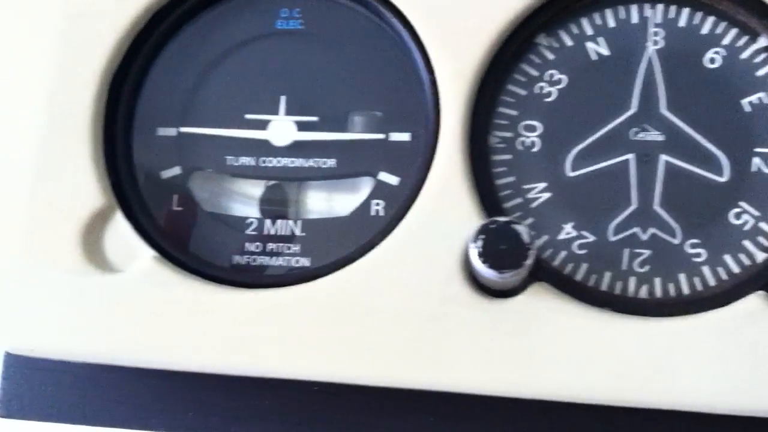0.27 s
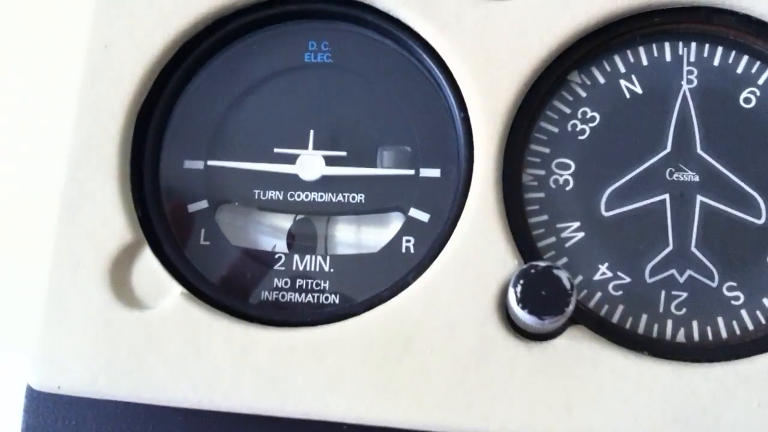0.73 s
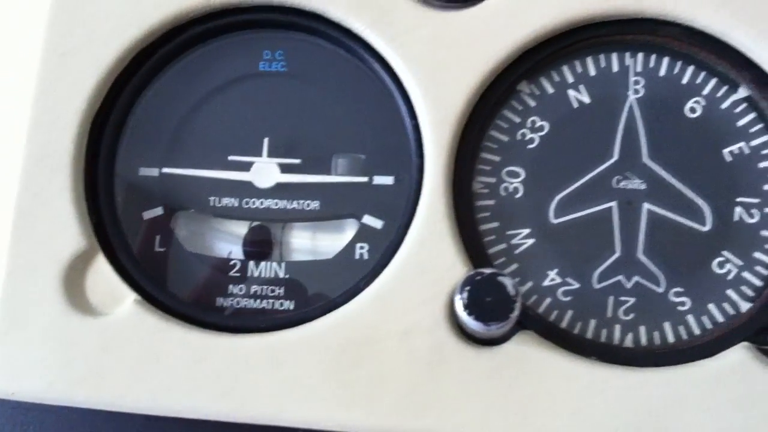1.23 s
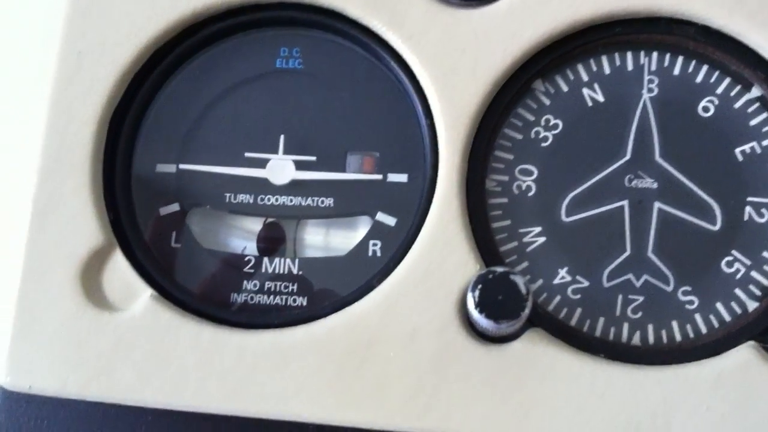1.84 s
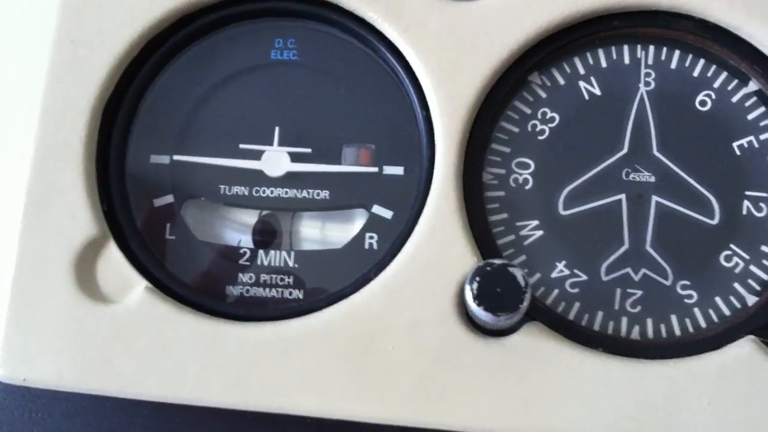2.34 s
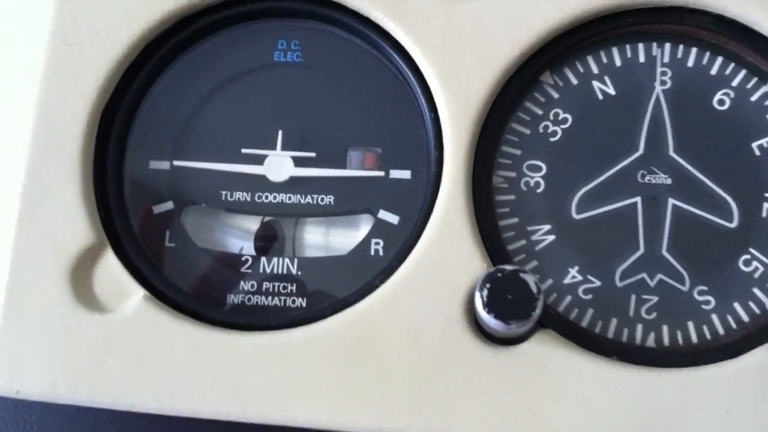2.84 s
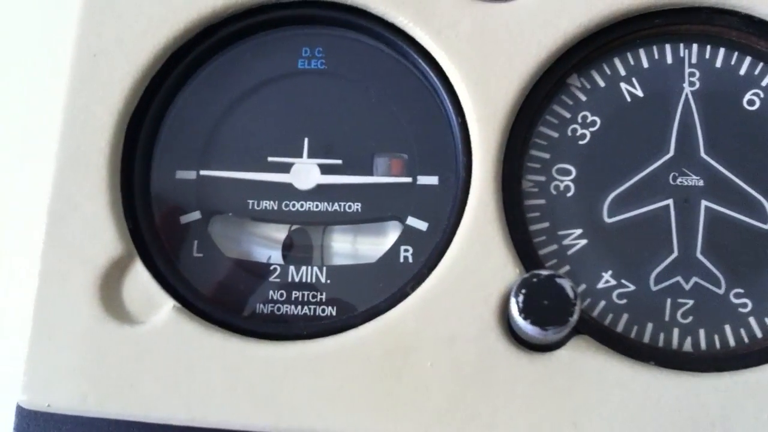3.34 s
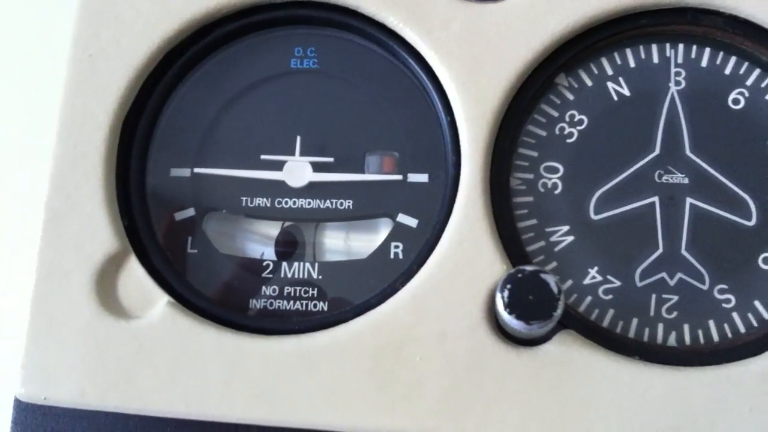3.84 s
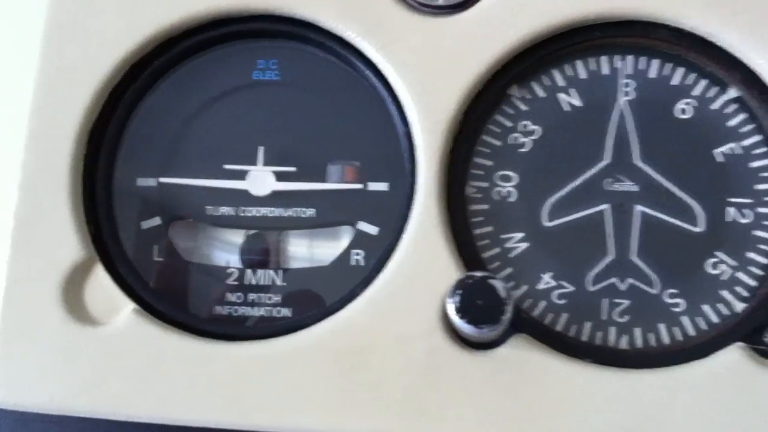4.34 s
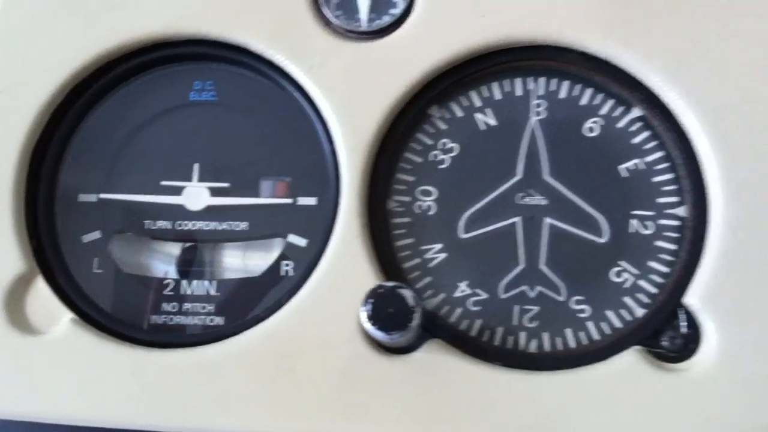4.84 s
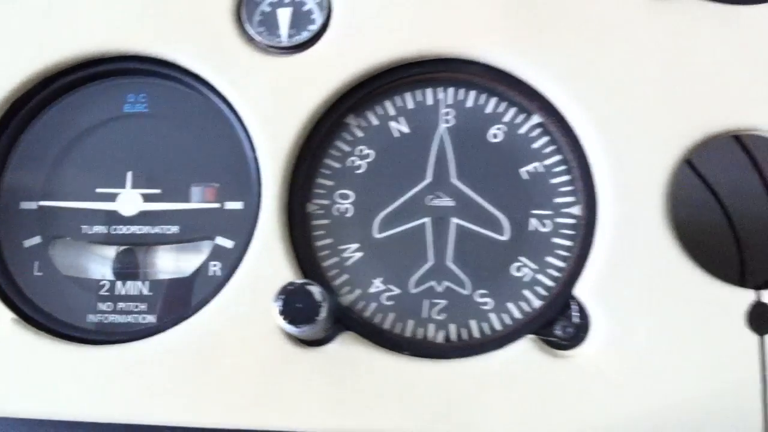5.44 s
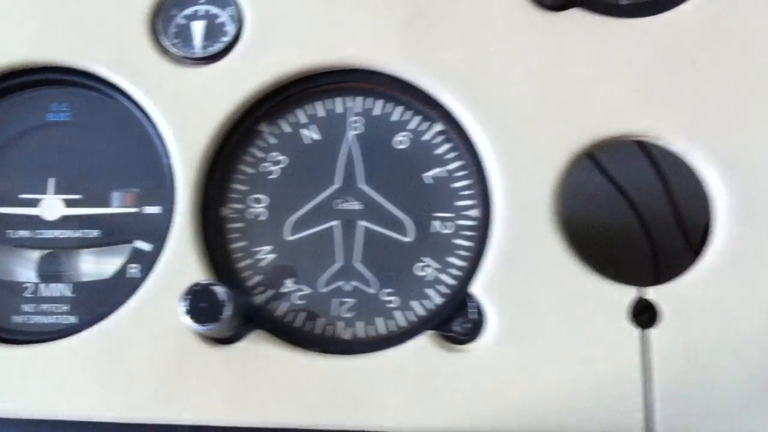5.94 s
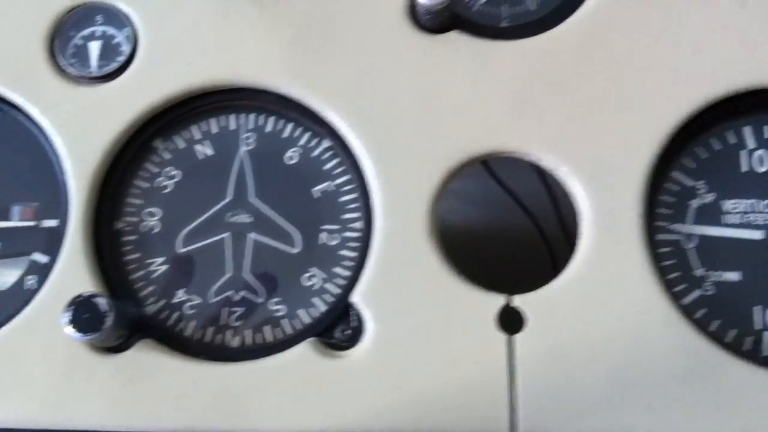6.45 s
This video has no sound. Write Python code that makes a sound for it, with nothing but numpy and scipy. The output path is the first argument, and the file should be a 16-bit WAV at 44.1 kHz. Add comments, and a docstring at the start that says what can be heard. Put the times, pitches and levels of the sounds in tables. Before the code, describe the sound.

An electric gyro in an aircraft instrument panel whines faintly, with several wavering tones over a fine bearing hiss. About a second and a half in, a switch snaps off with one sharp click. The rotor then coasts, its tones sliding slowly down together and swelling and sinking as they go. A few tiny ticks and a low hum sit underneath, heard close up in a small room.

```python
"""Gyro coasting down

An electric aircraft gyro whines in an instrument panel, close up in a small room. A switch snaps off
and the rotor coasts: the overtones of rotor and ball bearings glide down together and light up in the
fixed resonances of case and panel, while the two bearings beat slowly against each other.
Bearing hiss, a low room hum and a few faint ticks sit underneath."""
import sys
import numpy as np
from scipy import signal
from scipy.fft import rfft, irfft
from scipy.io import wavfile
from scipy.ndimage import map_coordinates

SR = 44100
rng = np.random.default_rng(int(sys.argv[2]) if len(sys.argv) > 2 else 0)


def to_wav(sig):
    """Store sig (one row per channel, or 1-D mono) as 16-bit WAV at the path in sys.argv[1].

    Samples outside -1..1 are clipped; the rate is SR.
    """
    pcm = np.clip(np.atleast_2d(sig), -1, 1) * 32767
    pcm = np.round(pcm).astype(np.int16)
    wavfile.write(sys.argv[1], SR, pcm.T)  # frames by channels


N = 295029
T = np.arange(N) / SR
BINS_HZ = np.arange(N // 2 + 1) * SR / N
LEVER_S, SNAP_S = 1.4445, 1.4598  # the lever gives, then the contact snaps over and cuts the power
# Rates at full speed: rotor turns, balls passing one spot of a race, a ball's flaw striking the races.
ROTOR_HZ, BALL_PASS_HZ, BALL_SPIN_HZ = 371.4, 580.4, 704.6


def undb(db):
    """Decibels to gain."""
    return 10 ** (np.asarray(db) / 20)


def unit(x):
    """Scale to rms 1."""
    return x / np.sqrt(np.mean(np.abs(x) ** 2))


def noise():
    """White noise."""
    return rng.standard_normal(N)


def colour(x, points):
    """Shape a sound with an EQ curve of (freq_hz, gain_db) points, then scale to rms 1."""
    hz, db = np.transpose(points)
    eq_db = np.interp(np.log(BINS_HZ + 1), np.log(hz), db)
    return unit(irfft(rfft(x) * undb(eq_db), N))


def bandpass(x, low_hz, high_hz):
    """Keep what lies between two edges."""
    return signal.sosfilt(signal.butter(3, [low_hz, high_hz], "band", fs=SR, output="sos"), x)


def wander(rate_hz):
    """Smooth random drift of rms 1, through rate_hz new values a second."""
    knots = rng.standard_normal(8192)
    drift = map_coordinates(knots, [T[::16] * rate_hz], order=3, mode="wrap")
    return unit(drift).repeat(16)[:N]


def fade(t60):
    """Exponential decay from 1, down 60 dB after t60 seconds."""
    return np.exp(-np.log(1000) * T / t60)


def delayed(x, start_s):
    """Start a sound at start_s."""
    return np.r_[np.zeros(int(start_s * SR)), x][:N]


def whine(cycles, flutter_db=2.5, jitter_rad=0.2):
    """A tone of rms near 1 whose level and phase tremble."""
    flutter = undb(flutter_db * wander(11))
    phase = 2 * np.pi * (cycles + rng.random()) + jitter_rad * wander(17)
    return np.sqrt(2) * flutter * np.sin(phase)


def ring(modes, contact_s):
    """Damped modes of alternating polarity, set going by a short push."""
    tones = sum((-1) ** k * undb(db) * fade(t60) * np.sin(2 * np.pi * hz * T)
                for k, (hz, db, t60) in enumerate(modes))
    return tones * (1 - np.exp(-T / contact_s))


# The dark tone of the room's rumble: freq_hz, gain_db
RUMBLE_EQ = [(20, -27), (45, -20), (90, -11), (130, 2.5), (200, -2.5), (260, -2.5), (330, -4), (400, -18.5),
             (700, -14), (2000, -28.5)]
# Low notes humming in the room: pitch_hz, level_db
HUM_TONES = [(60, -91), (120, -70.5), (145.5, -74.5), (196, -71)]


def room(rumble_db=-63):
    """A bed of low rumble with a wavering hum."""
    hum = sum(undb(db) * whine(hz * T, jitter_rad=0.28) for hz, db in HUM_TONES)
    return undb(rumble_db) * colour(noise(), RUMBLE_EQ) + hum


# Faint, bright ticks: start_s, level_db, low_hz, high_hz, t60_s
FAINT_TICKS = [(1.0596, -48, 2400, 9000, .07), (1.095, -52, 2400, 9000, .05),
               (1.7306, -43, 3500, 16000, .022), (1.766, -44, 2400, 7000, .025),
               (1.78, -49, 2500, 9000, .05), (2.5303, -37.5, 7200, 16000, .022)]


def ticks(echo_db=-13, echo_t60=0.28):
    """Tiny bursts of treble noise with a trace of room."""
    out = 0
    for start_s, db, low_hz, high_hz, t60 in FAINT_TICKS:
        envelope = fade(t60) + undb(echo_db) * fade(echo_t60)
        out += undb(db) * delayed(envelope * bandpass(noise(), low_hz, high_hz), start_s)
    return out


# The small tick of the lever giving way: pitch_hz, level_db, t60_s
LEVER_RING = [(3400, -30, .03), (3700, -34, .02), (5500, -36, .016), (6300, -38, .016), (7400, -39, .016)]
# The knock of switch and panel, where close pairs beat and bloom late: pitch_hz, level_db, t60_s
PANEL_RING = [(183, -45, 0.13), (930, -22.5, 0.018), (970, -35, 0.091), (1220, -19.5, 0.027),
              (1203, -37, 0.17), (1343, -39, .28), (1890, -33.5, 0.26), (2050, -9.5, 0.014),
              (2490, -40, 0.23), (3400, -46, .22), (3490, -2, 0.0048), (4580, -16.5, 0.013),
              (5050, -14.5, 0.018), (7770, -10, 0.0051), (9660, -19, 0.0075), (13900, -23, .008)]
# The bite of the snap's crack and of its echo: freq_hz, gain_db
SNAP_EQ = [(40, -34), (90, -26), (180, -8.5), (400, -12.5), (700, -11.5), (900, -9), (1250, -3.5),
           (1600, -4.5), (2200, 0), (2780, -7.5), (3500, 0), (4150, -7.5), (7500, -8), (11000, -11.5),
           (14500, -8.5), (16000, -26)]


def switch(crack_db=-18, crack_t60=0.037, echo_db=-26, echo_t60=0.37, treble_t60=0.19, build_s=0.0053):
    """The lever ticks, the contact cracks and rings the panel; the room answers, treble dying first."""
    lever = ring(LEVER_RING, contact_s=0.00018)
    knock = bandpass(ring(PANEL_RING, contact_s=0.0002), 130, 16000)
    crack = undb(crack_db) * fade(crack_t60) * colour(noise(), SNAP_EQ)
    walls = colour(noise(), SNAP_EQ)
    treble = irfft(rfft(walls) * BINS_HZ ** 2 / (BINS_HZ ** 2 + 5000 ** 2), N)
    tail = (walls - treble) * fade(echo_t60) + treble * fade(treble_t60)
    echo = undb(echo_db) * tail * (1 - np.exp(-T / build_s))
    return delayed(lever, LEVER_S) + delayed(knock + crack + echo, SNAP_S)


# Narrow rings of the metal housing in the hiss: centre_hz, width_hz, boost_db
HOUSING_RINGS = [(2582, 130, 8), (3020, 130, 4), (4050, 190, 3.5), (5200, 79, 10.5), (6900, 94, 0),
                 (7620, 710, 3.5), (8300, 210, 5.5), (10030, 350, 2.5), (10880, 820, 6)]
# The broad tone of the hiss: freq_hz, gain_db
HISS_EQ = [(240, -48), (400, -13), (620, -8), (720, -17), (1100, -13), (1750, -3.5), (2140, -4),
           (2420, -19), (3800, -10), (4150, -4.5), (4500, -5.5), (5700, -17.5), (8000, -15), (12000, -18),
           (15800, -29)]
# The fader ride on the hiss: time_s, level_db
HISS_RIDE = [(0, -54.5), (1.3, -54.5), (2.3, -55), (3.5, -55.5), (4.6, -55), (5.3, -57), (6.69, -57)]


def rolling_hiss(travel, patchy_db=9.0, line_spacing_hz=7, smooth_db=-3, oversample=4):
    """The roughness of the races comes round and round: a thicket of faint gliding lines in hiss."""
    grid_hz = np.arange(0, SR / 2, line_spacing_hz)
    heights = np.minimum(rng.standard_normal(len(grid_hz)), 2.2)  # capped so no line sticks out
    lines_db = patchy_db * np.interp(BINS_HZ, grid_hz, heights)
    roughness = irfft(rfft(noise()) * undb(lines_db), oversample * N)
    # The rotor runs over the same roughness ever more slowly, so the lines sink.
    thicket = np.interp(travel * SR * oversample, np.arange(oversample * N), roughness)
    rolling = unit(thicket) + undb(smooth_db) * noise()
    rings_db = sum(db / (1 + (2 * (BINS_HZ - hz) / width) ** 2) for hz, width, db in HOUSING_RINGS)
    hiss = irfft(rfft(rolling) * undb(rings_db), N)
    return undb(curve_db(HISS_RIDE)) * colour(hiss, HISS_EQ)


def curve_db(ride):
    """Join (time_s, level_db) points with straight lines."""
    return np.interp(T, *np.transpose(ride))


# Fixed resonances of case and panel: centre_hz, width_hz, boost_db
CASE_RESONANCES = [(337.3, 32.5, 9), (356, 13, 9), (497, 8, 10.5), (620.6, 25, 14), (807, 28, 5.5),
                   (848.5, 12, 10), (987, 24, 8), (1107, 16, 7), (1190, 11.6, 12.5), (1389, 224, 12),
                   (1480, 23, 9), (1756, 170, 21), (1970, 410, 11.5), (1996, 93, 11), (2107, 68, 21),
                   (3034, 52, 16), (3304, 192, 8.5), (3594, 270, 10.5), (3950, 32, 17.5), (4080, 186, 16.5),
                   (4287, 205, 18), (4440, 200, 16.5), (4560, 86, 12), (5100, 160, 12), (7720, 580, 9.5),
                   (10900, 650, 9), (11700, 200, 3)]


def case_gain(pitch_hz):
    """A gliding tone lights up as it crosses each resonance of case and panel."""
    power = 1 + sum(undb(db) ** 2 / (1 + (2 * (pitch_hz[::64] - centre) / width) ** 2) ** 2
                    for centre, width, db in CASE_RESONANCES)
    return np.interp(T, T[::64], np.sqrt(power))


def gliding_tones(partials, speed, travel, **tremble):
    """(pitch_hz, level_db) partials follow the rotor through the case, trembling with bearing play."""
    return sum(undb(db) * case_gain(hz * speed) * whine(hz * travel, **tremble) for hz, db in partials)


# Smeared tones of slipping balls, at full speed and before the case: centre_hz, width_hz, level_db
SLIP_BANDS = [(1562, 97, -82.5), (2293, 90, -88), (3108, 50, -82), (4057, 110, -85), (4754, 220, -81),
              (4870, 130, -82.5), (5390, 220, -81.5), (6300, 300, -79.5), (8300, 980, -79.5),
              (12000, 270, -89), (13400, 810, -78)]


def slipping_balls(speed, travel, flutter_db=1.75):
    """Uneven ball speeds smear some tones into narrow, restless bands that fall with the rotor."""
    out = 0
    for hz, width, db in SLIP_BANDS:
        phase = 2 * np.pi * hz * travel
        band = wander(width) * np.cos(phase) + wander(width) * np.sin(phase)
        out += undb(db + flutter_db * wander(14)) * case_gain(hz * speed) * band
    return out


def high_whines(speed, travel, first=11, last=20, first_db=-85, step_db=1.3):
    """The sharp edge of each ball's passing gives thin high overtones, each with a side tone above."""
    partials = [(k * BALL_PASS_HZ + offset_hz, first_db - step_db * (k - first))
                for k in range(first, last + 1) for offset_hz in (0, ROTOR_HZ)]
    return gliding_tones(partials, speed, travel)


# Levels in these five tables are before the case resonances; frequencies are at full speed.
# The rotor's unbalance and a rattle on every third turn: thirds_of_rotor_rate, level_db
ROTOR_PARTIALS = [(3, -71.5), (4, -79.5), (5, -74.5), (6, -79), (7, -75.5), (8, -81)]
# The quieter overtones of the ball pass: harmonic, level_db
PASS_PARTIALS = [(2, -78.5), (4, -80.5), (5, -90), (6, -81), (7, -89.5), (8, -80), (9, -87), (10, -79)]
# The tones of a ball's flaw striking the races: harmonic, level_db
FLAW_PARTIALS = [(1, -77), (2, -84.5), (3, -92)]
# How strongly side tones sing across the spectrum: freq_hz, level_db
SIDE_TONE_CURVE = [(200, -96), (850, -77.5), (1400, -85), (2100, -92.5), (2600, -99), (3200, -94.5),
                   (4400, -88.5), (5100, -90), (5600, -95), (6200, -82)]
# Lone whines of the bearings: pitch_hz, level_db
LONE_WHINES = [(659, -78.5), (1198, -82), (1527, -85), (1567, -82), (1685, -89), (1820, -90), (1944, -90),
               (2369, -90), (3005, -88), (3108, -86), (3212, -86), (3273, -86), (4034, -86), (4433, -85),
               (4890, -84), (11768, -88)]


def bearing_tones(speed, travel, outer_side_db=-7, uneven_db=2.0):
    """Firm overtones of rotor and balls, and restless whines around them, all gliding down as one."""
    families = [(ROTOR_HZ / 3, ROTOR_PARTIALS), (BALL_PASS_HZ, PASS_PARTIALS),
                (BALL_SPIN_HZ, FLAW_PARTIALS)]
    overtones = [(k * base_hz, db) for base_hz, partials in families for k, db in partials]
    # The load turns with the rotor and gives each ball-pass tone two side tones above and two below.
    sides = []
    for harmonic, *_ in BEATING_PAIRS + PASS_PARTIALS:
        for rotor_rates, trim_db in ((-2.2, outer_side_db), (-1, 0), (1, 0), (2, outer_side_db)):
            hz = abs(harmonic * BALL_PASS_HZ + rotor_rates * ROTOR_HZ)
            db = np.interp(hz, *np.transpose(SIDE_TONE_CURVE)) + trim_db
            sides.append((hz, db + uneven_db * rng.standard_normal()))
    firm = gliding_tones(overtones, speed, travel, flutter_db=1.2, jitter_rad=0.19)
    restless = gliding_tones(LONE_WHINES + sides, speed, travel)
    return firm + restless


# The two lead tones of the ball pass; crests are placed on the rotor's slowing clock:
# harmonic, level_db, second_bearing_gain_db, crest_s, let_go_drop_db, fade_db_per_s
BEATING_PAIRS = [(1, -63.5, -2, 1.655, -0.5, 2), (3, -58.5, -3, 1.405, 3.5, 2.1)]


def beating_tones(travel, coasting_s, detune_hz=0.55, let_go_s=0.39):
    """Two bearings pass their balls a hair apart: their tones swell and sink, and fade while coasting."""
    let_go = np.minimum(coasting_s / let_go_s, 1)  # 0 under power, 1 once the drive has let go
    out = 0
    for harmonic, db, second_db, crest_s, drop_db, fade_db_per_s in BEATING_PAIRS:
        beat_phase = 2 * np.pi * harmonic * detune_hz * (travel - crest_s)
        swell = np.abs(1 + undb(second_db) * np.exp(1j * beat_phase))
        level_db = db - drop_db * let_go - fade_db_per_s * coasting_s
        tone = whine(harmonic * BALL_PASS_HZ * travel, flutter_db=1.04, jitter_rad=0.22)
        out += undb(level_db) * swell * tone
    return out


def scene(slowing_hz_per_s=14.22, drag_s=78):
    """Gyro, switch, ticks and room in both channels; after the snap the rotor slows ever more gently."""
    coasting_s = np.maximum(T - SNAP_S, 0)
    lost_hz = slowing_hz_per_s * drag_s * (1 - np.exp(-coasting_s / drag_s))
    speed = 1 - lost_hz / ROTOR_HZ  # fraction of full speed
    travel = np.cumsum(speed) / SR  # the rotor's clock: rotation in seconds of full speed
    tones = beating_tones(travel, coasting_s) + bearing_tones(speed, travel) + high_whines(speed, travel)
    gyro = tones + slipping_balls(speed, travel) + rolling_hiss(travel)
    return np.tile(gyro + switch() + ticks() + room(), (2, 1))


def record(dry, top_hz=15800):
    """A steep low-pass trims the highest treble."""
    return signal.sosfilt(signal.ellip(10, .2, 70, top_hz, fs=SR, output="sos"), dry)


dry = scene()
out = record(dry)
to_wav(out)
```